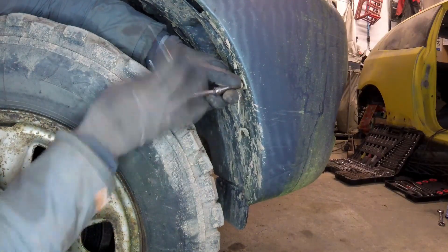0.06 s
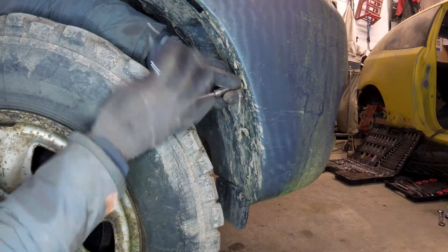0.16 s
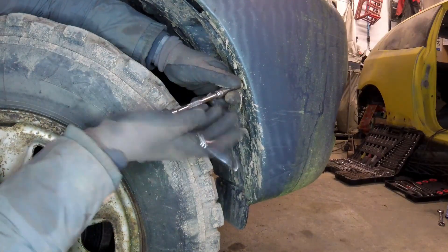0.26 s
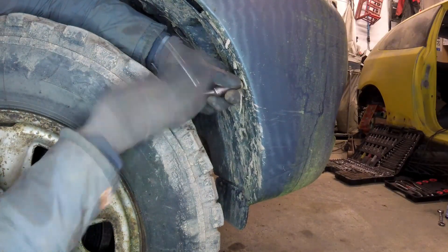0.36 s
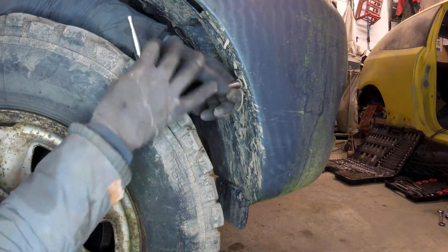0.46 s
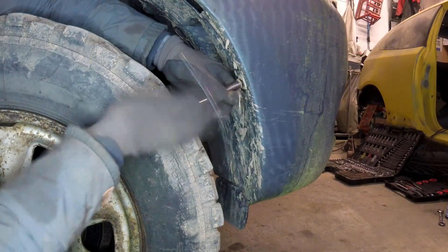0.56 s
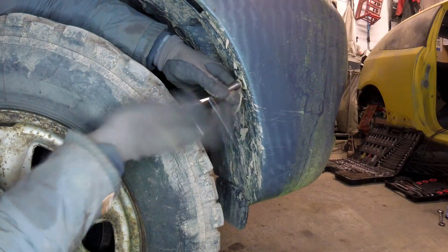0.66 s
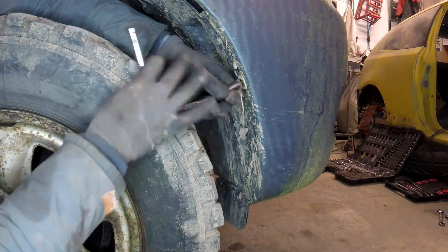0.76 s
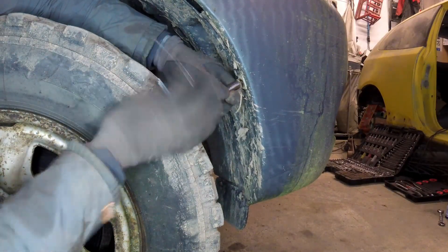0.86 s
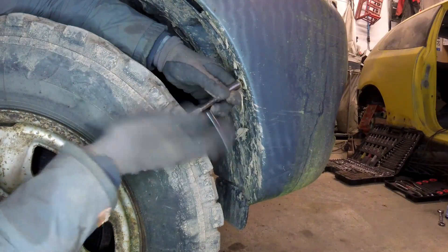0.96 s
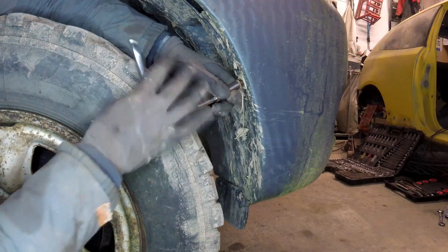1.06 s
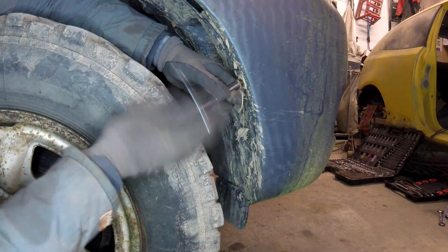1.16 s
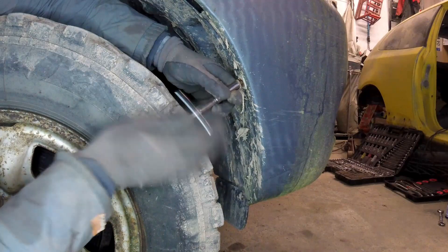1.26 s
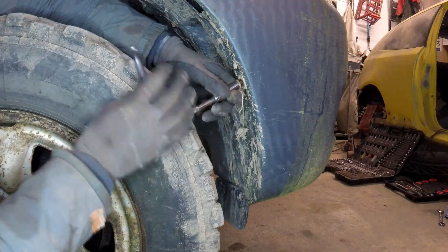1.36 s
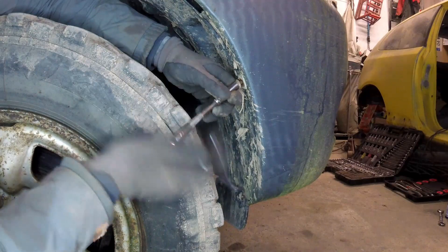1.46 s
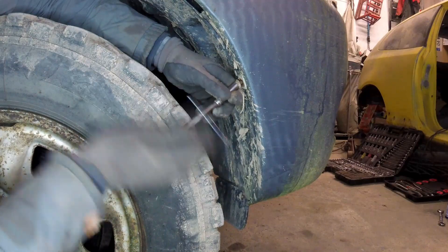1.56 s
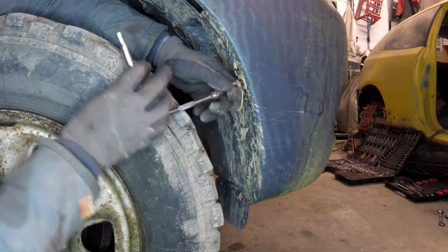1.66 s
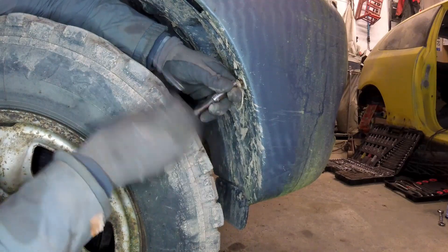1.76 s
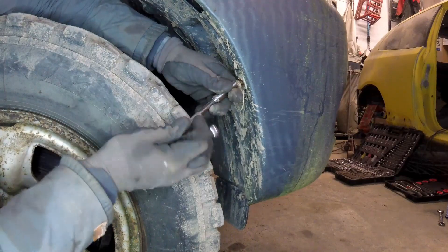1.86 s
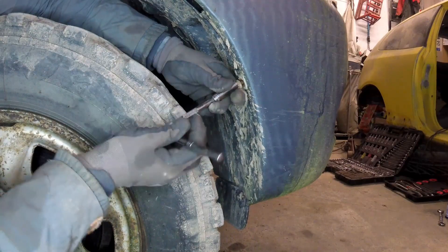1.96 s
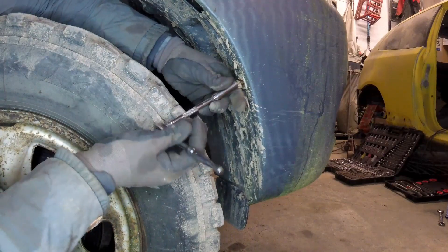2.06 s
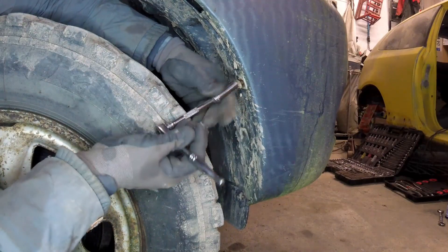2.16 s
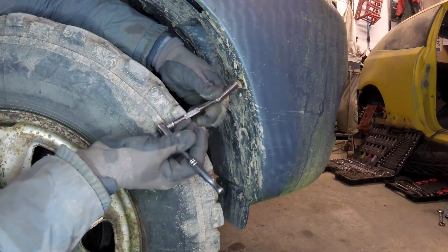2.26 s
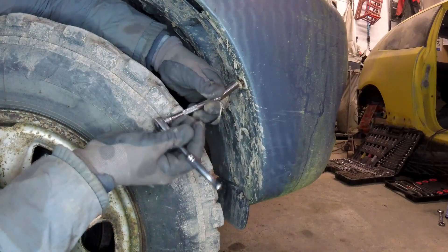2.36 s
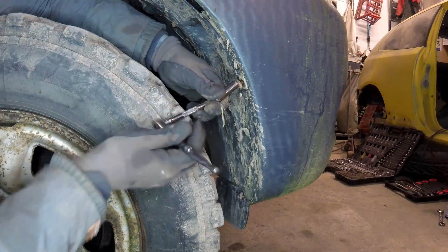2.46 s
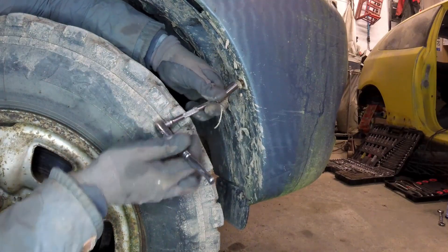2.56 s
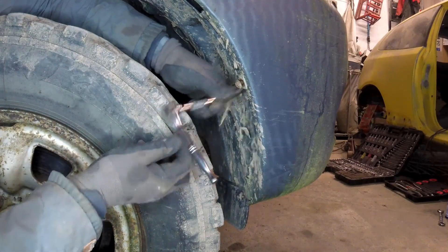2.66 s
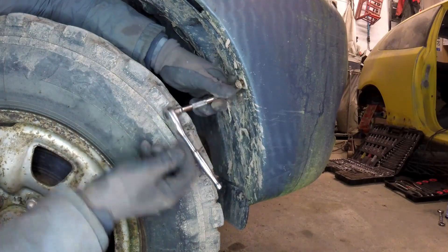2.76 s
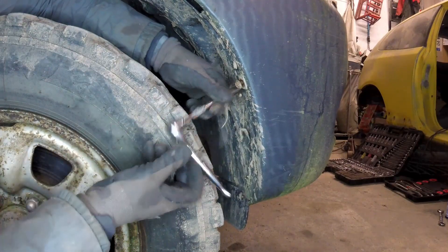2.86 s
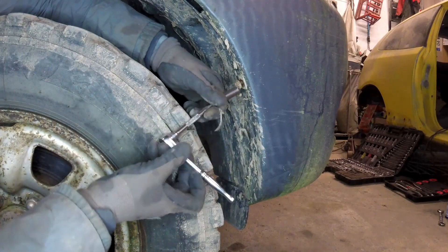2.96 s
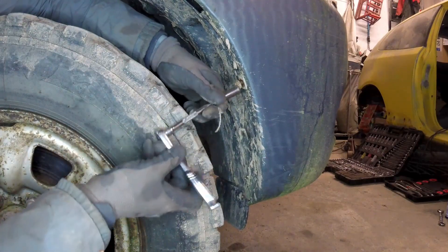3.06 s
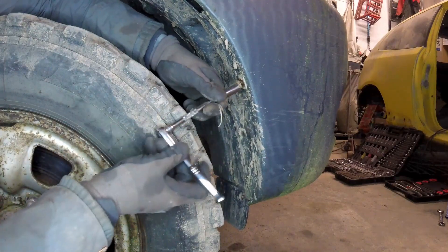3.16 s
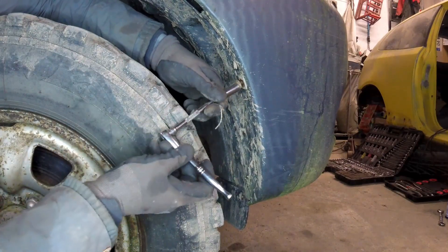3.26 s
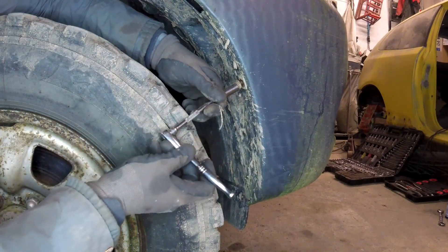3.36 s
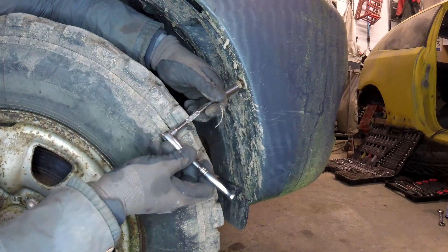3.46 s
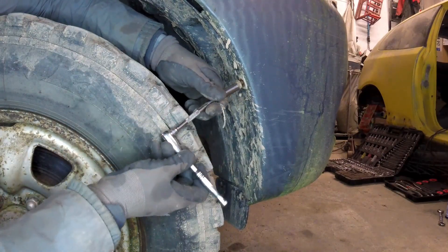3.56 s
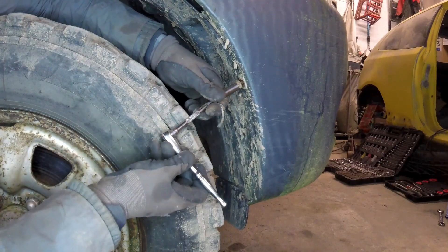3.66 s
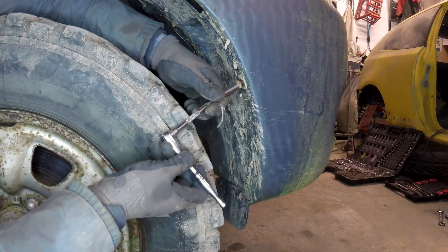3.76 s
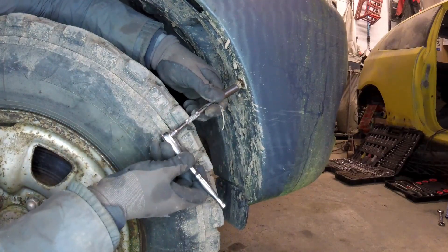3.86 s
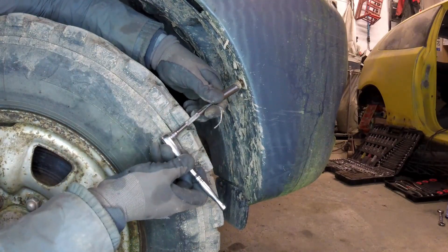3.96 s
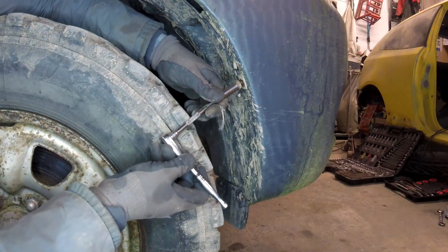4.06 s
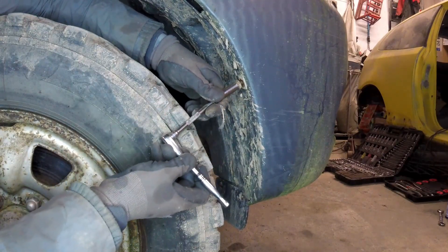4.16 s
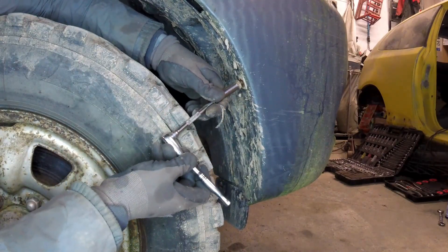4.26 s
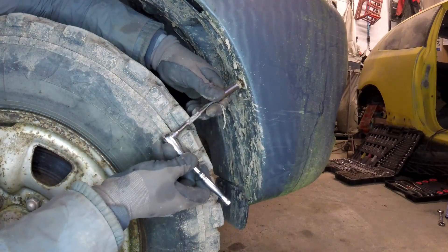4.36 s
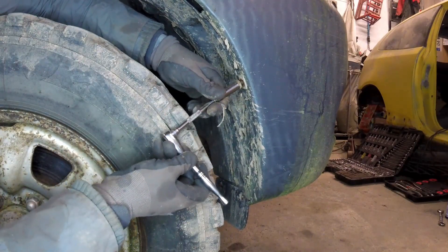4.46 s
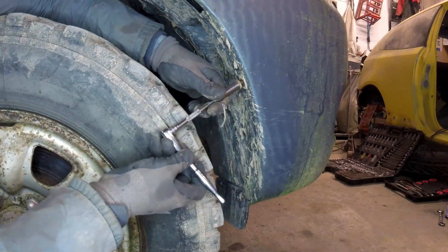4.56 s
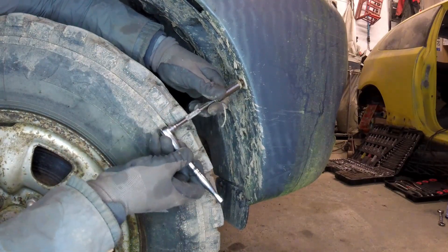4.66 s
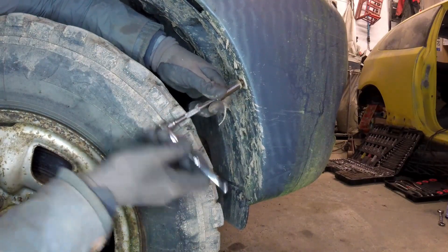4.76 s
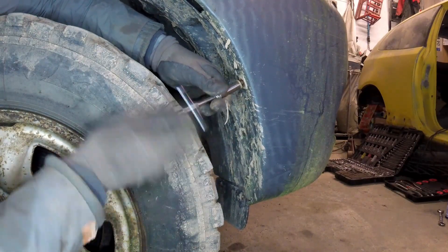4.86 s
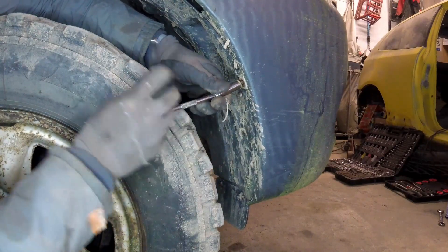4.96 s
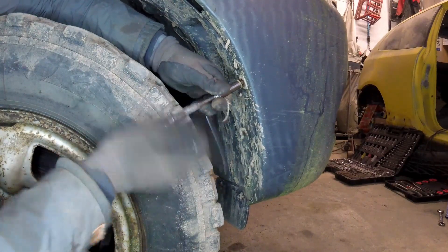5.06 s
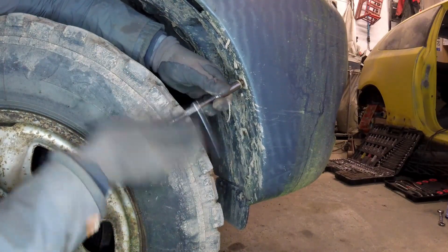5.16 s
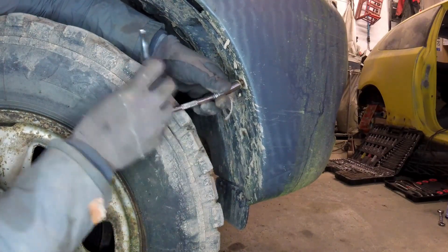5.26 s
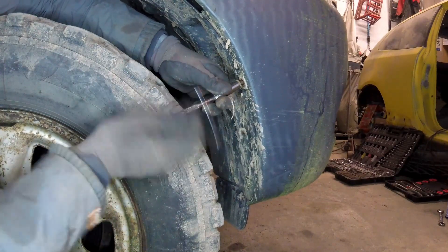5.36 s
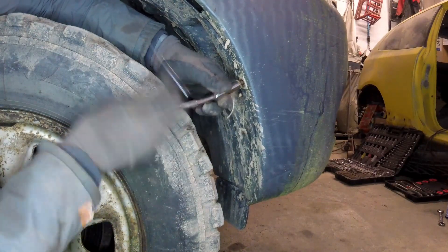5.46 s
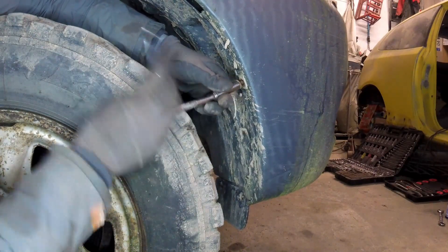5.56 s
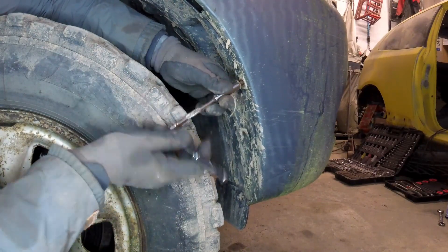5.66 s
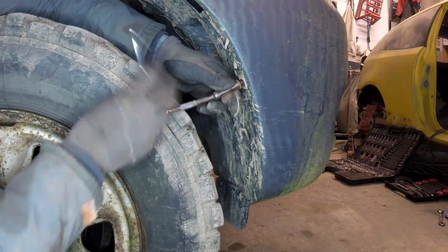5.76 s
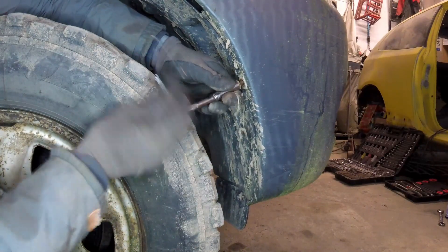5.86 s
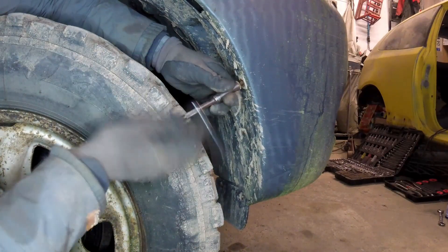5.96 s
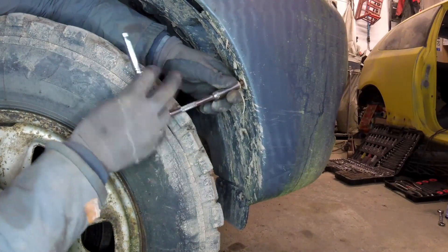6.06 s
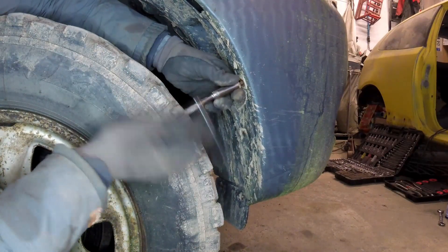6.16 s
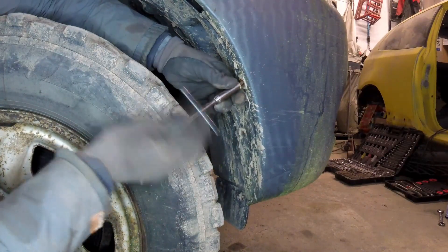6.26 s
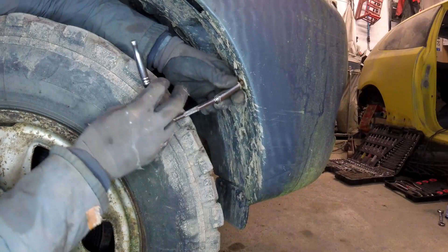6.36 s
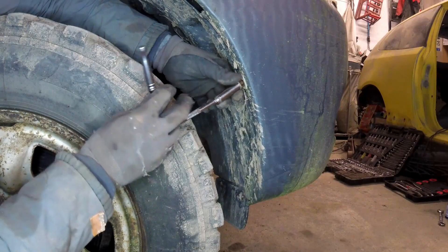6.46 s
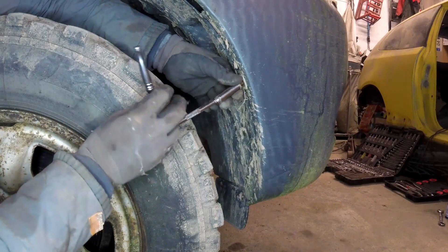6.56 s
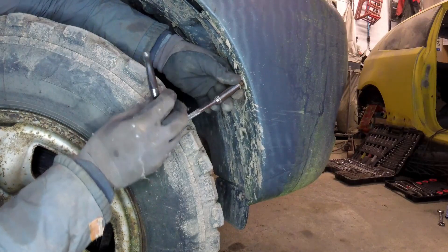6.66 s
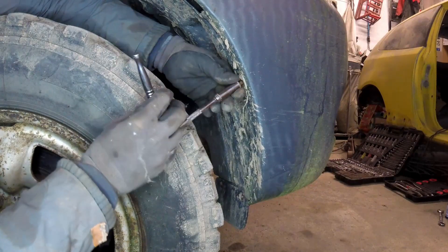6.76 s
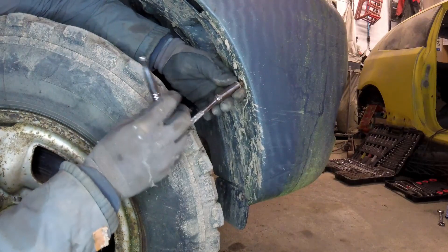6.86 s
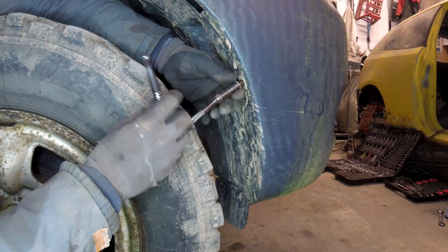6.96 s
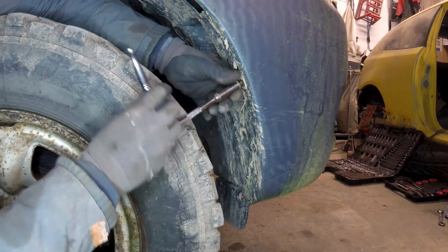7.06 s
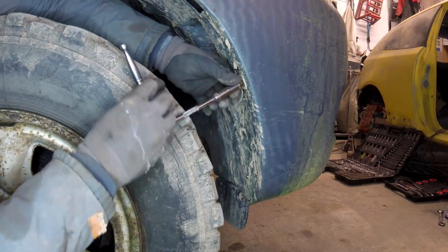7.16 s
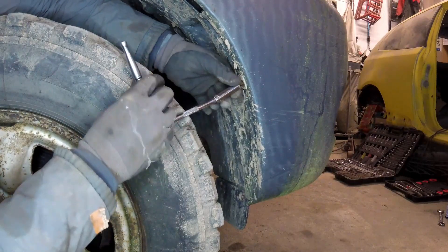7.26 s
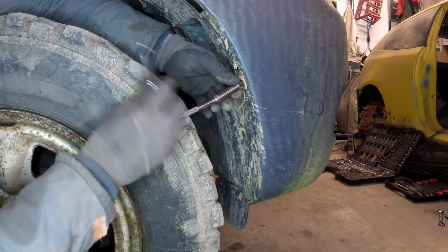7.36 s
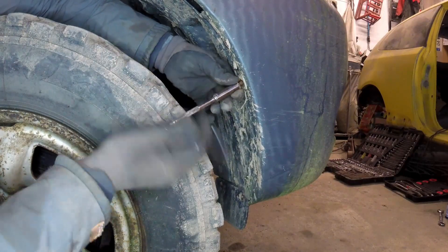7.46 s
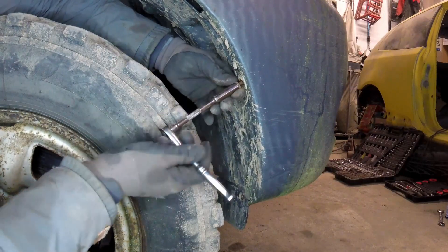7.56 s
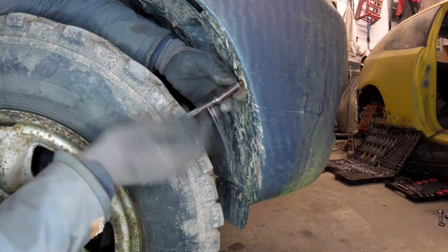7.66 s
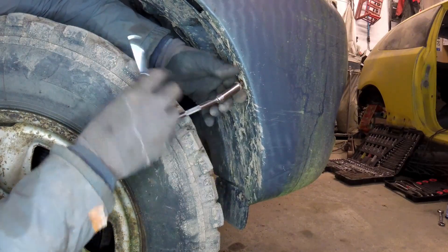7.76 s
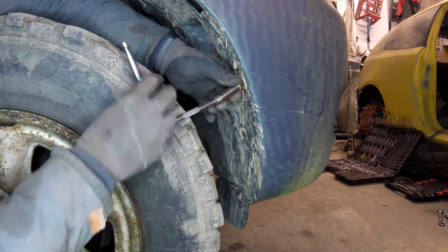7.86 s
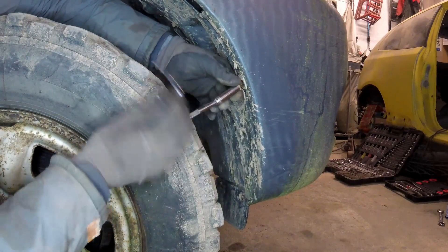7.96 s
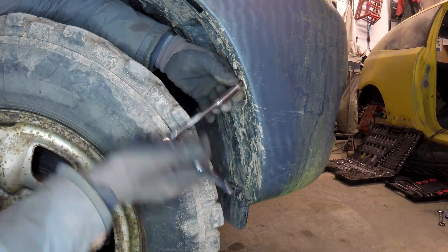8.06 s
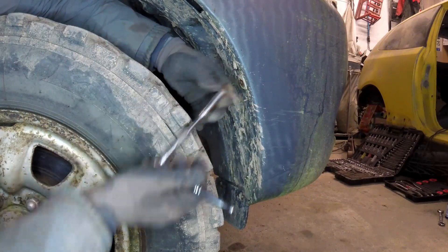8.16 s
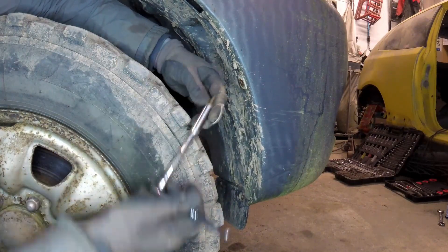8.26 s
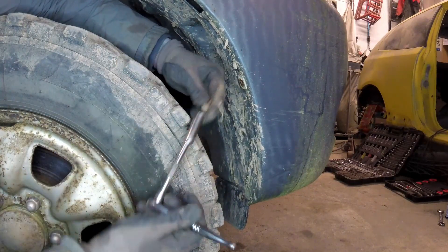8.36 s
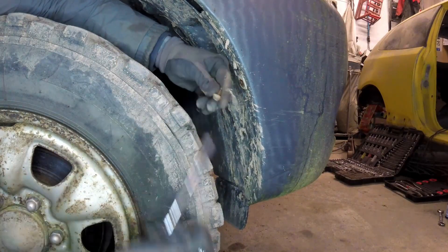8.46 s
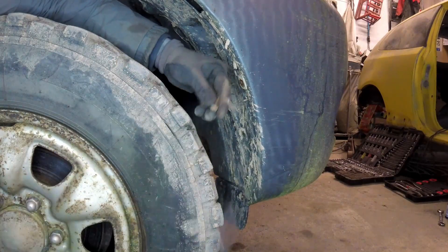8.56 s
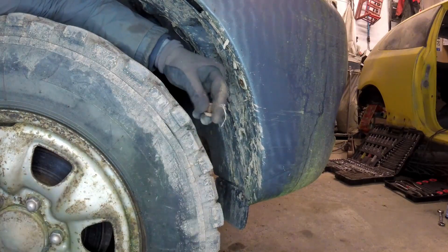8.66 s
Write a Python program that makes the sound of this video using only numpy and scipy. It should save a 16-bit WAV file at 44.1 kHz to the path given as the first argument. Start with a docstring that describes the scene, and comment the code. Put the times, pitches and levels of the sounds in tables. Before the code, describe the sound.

Close by in a quiet workshop, a socket ratchet undoes a bolt in a truck's wheel arch. Quick, bright bursts of clicks come about three a second, with a rattling extension bar and dull panel bumps. The handle then clatters loudly against the wheel as a glove rubs the tyre. After a few scattered metal knocks the ratcheting resumes, thins out, and ends with one sharp click.

```python
"""Socket ratchet in a wheel arch.

A ratchet on a long extension undoes a truck bolt in a quiet workshop. On each back swing the
pawl skips over the teeth and shakes the bar; on each drive swing the thread rasps and the bar
jolts the arch panel. A glove rubs the tyre. Once the handle swings down and clatters on the wheel."""
import sys
import numpy as np
from scipy import signal
from scipy.fft import rfft, irfft
from scipy.io import wavfile

SR = 44100
rng = np.random.default_rng(int(sys.argv[2]) if len(sys.argv) > 2 else 0)


def dump_mix(stems):
    """Bounce the given channels to the path in sys.argv[1] as a 16-bit WAV at rate SR."""
    frames = np.atleast_2d(stems).T  # one column per channel
    limited = np.clip(frames, -1, 1)  # hard clip at full scale
    pcm = np.round(limited * 32767).astype(np.int16)
    wavfile.write(sys.argv[1], SR, pcm)


N = 384993

# Back swings, each followed by a drive swing under load:
# start_s, end_s, top_teeth_per_s, first_click_db, last_click_db, rattle_db, load_db
BACK_SWINGS = [(0.179, 0.251, 276, -25, -28.5, -0.5, -23), (0.4987, 0.595, 314, -26, -30.5, -1.5, -18),
               (0.814, 0.905, 330, -25.5, -28.5, 1.5, -24), (1.104, 1.189, 314, -28.5, -29, -0.5, -25),
               (1.3928, 1.472, 310, -25.5, -31, -3.5, -23), (1.713, 1.78, 228, -22.5, -33.5, -8, -35),
               (4.998, 5.091, 226, -27.5, -28.5, -2, -28), (5.312, 5.379, 293, -26.5, -28, -2, -23),
               (5.571, 5.646, 279, -28.5, -22, -2.5, -23.5), (5.842, 5.916, 300, -24, -23, -7, -20.5),
               (6.133, 6.175, 302, -20, -29.5, -6.5, -30.5), (6.595, 6.684, 148, -24.5, -32, -9.5, -41),
               (7.28, 7.531, 268, -26.5, -26.5, -8.5, -38.5), (7.89, 8.071, 300, -24.5, -26.5, -10, -48)]
# Handle coasting to rest: start_s, stop_s, first_gap_s, level_db
HANDLE_COASTS = [(0.255, 0.29, .027, -31.5), (1.7874, 1.83, .0115, -28), (1.8486, 1.89, .0277, -25),
                 (1.886, 1.99, .0272, -28.5), (2.81, 2.835, 0.015, -27), (2.848, 2.92, .0198, -27.5),
                 (3.062, 3.07, .02, -44.5), (3.5644, 3.57, .02, -45), (5.661, 5.675, 0.0088, -30),
                 (6.7263, 6.75, .013, -29.5), (6.8407, 6.89, .03, -28.5), (7.5326, 7.56, 0.017, -24),
                 (8.089, 8.135, 0.012, -26), (8.7093, 8.711, .02, -14)]
# Hard knocks of socket and handle: start_s, level_db, ring_db, tilt_db_per_oct, panel_jolt_db
TOOL_KNOCKS = [(0.021, -32.5, -10, 1, -15), (0.059, -38.5, -1, 8.5, -39), (0.128, -29.5, -10, 8, -34),
               (0.358, -28, -21, -5.5, -23), (0.691, -26.5, -14, -5, -23.5), (1.503, -36, 8, 0, -37),
               (1.548, -25, -23, -3.5, -23), (1.694, -32.5, -1.5, 1, -25), (2.0295, -39.5, 6, 7.5, -24.5),
               (2.559, -24.5, -30, 1, -24), (2.594, -21, -19, -1.5, -35), (2.608, -19.5, -17, -2.5, -11.5),
               (2.626, -19.5, -12, 1.5, -19), (2.639, -22.5, -8.5, -0.5, -7.5),
               (2.65, -18.5, -12, -0.5, -18), (2.667, -23, -15.5, -4.5, -27), (2.868, -28.5, -17, 0, -18.5),
               (2.902, -23, -29, -4, -21.5), (3.168, -36.5, -31, -0.5, -38), (3.288, -32, -31, -2, -30),
               (3.308, -27.5, -25, -2, -22), (3.348, -31.5, -21, -2.5, -29), (3.495, -24.5, -7.5, 0.5, -16),
               (4.367, -22.5, -18, -2, -18.5), (4.727, -25, -36, 2.5, -36), (4.746, -27.5, -23, -3, -22),
               (5.089, -33, -4, 5, -23), (8.7052, -40, 25, -5, -26)]
# Dull bumps of hand and tool on the panel: start_s, level_db, tilt_db_per_oct
PANEL_BUMPS = [(0.074, -25, -7), (0.724, -20.5, -7), (1.002, -23, 0), (1.457, -20.5, -6),
               (1.699, -16.5, -8.5), (2.186, -20.5, -1.5), (2.719, -19, -4), (3.269, -29, 5),
               (3.734, -33.5, -11), (5.226, -25, -2.5), (6.094, -26.5, -1), (6.38, -32.5, -6),
               (8.05, -32, -1)]
# Bolt turned without ratcheting: start_s, end_s, level_db
HAND_TURNS = [(0, .18, -51), (2.1, 2.32, -60), (2.35, 2.54, -53.5), (2.56, 2.83, -55), (4.72, 4.98, -59.5),
              (8.06, 8.46, -57), (8.5, 8.78, -57)]
# Glove sliding over the tyre to a new grip: start_s, end_s, level_db
GRIP_CHANGES = [(0, .18, -51), (1.42, 1.63, -49.5), (2.58, 2.71, -29), (3.26, 3.43, -50),
                (3.505, 3.56, -47.5)]
# Modes of ratchet head and socket: pitch_hz, level_db, t60_s
STEEL_MODES = [(4680, -24, 0.0081), (5100, -18, 0.042), (5370, -2.5, 0.025), (5400, -9, 0.038),
               (6350, 0, 0.033), (6700, -8, 0.039), (6600, -18, 0.0084), (8200, -3, 0.017),
               (8720, -40, .015), (9600, -2, 0.078)]
# Modes of the arch panel: pitch_hz, level_db, t60_s
PANEL_MODES = [(149, -16, .14), (162, -0.5, .24), (181, 7, .11), (219, -6, .22), (255, -2, .17),
               (315, -8, .18), (339, -8, .17), (364, -5.5, .16), (431, -10.5, .18), (474, -7, .13),
               (640, -16, .18)]
# Pawl snap: freq_hz, level_db
PAWL_SPECTRUM = [(2500, -23), (3900, -20.5), (4500, -12.5), (5100, 3), (5600, 3.5), (6400, -5), (7500, -3),
                 (10000, -7.5), (11200, -15), (12200, -29), (13500, -23), (15500, -35)]
# Extension bar rattle: freq_hz, level_db
BAR_SPECTRUM = [(200, 6.5), (450, 5.5), (800, -5.5), (1200, 0), (1550, -0.5), (1800, -1.5), (2020, -6.5),
                (2450, -4.5), (2950, -6), (3800, -19.5), (6000, -55)]
# Steel-on-steel crack: freq_hz, level_db
KNOCK_SPECTRUM = [(130, 8), (300, 2), (600, -3.5), (1000, 0), (1500, -6.5), (2000, -11), (2900, -11.5),
                  (4000, -25), (5300, -19), (10000, -64)]
# Thread rasp: freq_hz, level_db
THREAD_SPECTRUM = [(300, -2.5), (900, -1), (1600, -3), (3000, -5.5), (4000, -12.5), (4800, -3.5),
                   (5400, 3.5), (6300, -10), (8000, -8.5), (9600, -7.5), (11500, -29), (15000, -32)]
# Glove rub: freq_hz, level_db
GLOVE_SPECTRUM = [(110, -24.5), (160, -5.5), (400, 1.5), (700, -6.5), (1400, -17), (3000, -27),
                  (4500, -30.5), (10000, -50)]
# Workshop air: freq_hz, level_db
AIR_SPECTRUM = [(25, -19.5), (70, 2), (105, -8.5), (135, -0.5), (160, -5.5), (246, -12), (500, -24),
                (900, -25), (1700, -29.5), (3170, -37.5), (4040, -48.5), (5400, -36), (6550, -40),
                (9600, -39.5), (12000, -50.5), (15500, -55)]

DRIVE_S, TAKE_UP_S = .21, .025  # longest drive swing; slack before the pawl takes the load


def ratchet(end_speed_ratio=.45, jitter=.06, scatter_db=2, swell_db=5, max_teeth=80):
    """The pawl skips faster, then slower, through each back swing; teeth go from bright to round."""
    out = np.zeros(N)
    stages = np.linspace(0, 1, 5)
    for start_s, end_s, top_teeth_per_s, first_db, last_db, rattle_db, _ in BACK_SWINGS:
        # Neighbouring teeth sound alike, so a fast run takes on a pitch.
        alike = np.array([(tooth(tilt), bar_shudder()) for tilt in np.linspace(3, -5, len(stages))])
        loose = np.array([(tooth(), bar_shudder()) for _ in range(6)])
        deviations = rng.standard_normal((max_teeth, 2))
        picks = rng.integers(len(loose), size=max_teeth)
        at_s = start_s
        for (late, strength), pick in zip(deviations, picks):
            if at_s > end_s:
                break
            progress = (at_s - start_s) / (end_s - start_s)
            arc = np.sin(np.pi * progress)
            blend = np.sqrt(np.maximum(1 - np.abs(stages - progress) / stages[1], 0))
            click, rattle = np.tensordot(blend, alike, 1) + .71 * loose[pick]
            # The bar shakes most while the hand speeds up.
            bar_db = rattle_db - 3.5 + 3 * (arc - 1) - 4 * (progress - .5)
            force = np.sin(np.pi * progress ** 2.37)  # peaks after mid-swing
            level_db = first_db + (last_db - first_db) * progress
            level_db += scatter_db * strength + swell_db * (force - .6)
            add(out, at_s, undb(level_db) * (peak(click) + undb(bar_db) * peak(rattle)))
            teeth_per_s = top_teeth_per_s * (end_speed_ratio + (1 - end_speed_ratio) * arc)
            at_s += (1 + jitter * late) / teeth_per_s
    return out


def tooth(tilt_db_per_oct=0, snap_t60_s=.007, rise_s=.00012, bounce_s=.0015, bounce_db=-5, ring_db=-20):
    """The pawl snaps into a tooth gap, bounces once and rings the steel."""
    t = clock(.04)
    snap = rng.standard_normal(len(t)) * fade(t, snap_t60_s) * (1 - np.exp(-t / rise_s))
    delay_s = bounce_s * rng.uniform(.591, 1.6)
    snap += undb(bounce_db) * np.interp(t - delay_s, t, snap, left=0)
    seating = rng.uniform(.95, 1.07)  # no two teeth seat alike
    snap = colour(snap, [(hz * seating, db + tilt_db_per_oct * np.log2(hz)) for hz, db in PAWL_SPECTRUM])
    steel = ring(STEEL_MODES, t, tilt_db_per_oct, scatter_db=4, detune=.04)
    return peak(peak(snap) + undb(ring_db) * peak(steel))


def bar_shudder(t60_s=.034):
    """One tooth shakes the long extension bar."""
    t = clock(.04)
    return peak(colour(rng.standard_normal(len(t)) * fade(t, t60_s), BAR_SPECTRUM))


def coasting_teeth(gap_growth=1.5, rattle_db=-15):
    """Lone, crisp teeth, ever further apart as the handle comes to rest."""
    out = np.zeros(N)
    for at_s, stop_s, gap_s, level_db in HANDLE_COASTS:
        while at_s < stop_s:
            add(out, at_s, undb(rng.normal(level_db, 1)) * tooth(tilt_db_per_oct=3, snap_t60_s=.0046))
            add(out, at_s, undb(level_db + rattle_db) * bar_shudder())
            at_s += gap_s
            gap_s *= gap_growth
    return out


def drive_swings():
    """A drive follows each back swing, at most until the next: start_s, end_s, load_db."""
    next_starts_s = [swing[0] for swing in BACK_SWINGS[1:]] + [np.inf]
    return [(turn_s, min(turn_s + DRIVE_S, next_s), load_db)
            for (_, turn_s, *_, load_db), next_s in zip(BACK_SWINGS, next_starts_s)]


def pawl_catches(level_db=-39, scatter_db=2):
    """The pawl clinks as each drive swing takes up the slack."""
    out = np.zeros(N)
    for turn_s, *_ in drive_swings():
        gain = undb(rng.normal(level_db, scatter_db))
        add(out, turn_s + TAKE_UP_S, gain * tooth(tilt_db_per_oct=-5, snap_t60_s=.014))
    return out


def knocks(crack_t60_s=.011, spill_t60_s=.13, spill_db=-12, rise_s=.00085, crack_boost_db=2):
    """Steel meets steel: a crack, a short clang and a spill of sound round the arch."""
    out, t = np.zeros(N), clock(.3)
    envelope = (fade(t, crack_t60_s) + undb(spill_db) * fade(t, spill_t60_s)) * (1 - np.exp(-t / rise_s))
    for at_s, level_db, ring_db, tilt_db_per_oct, _ in TOOL_KNOCKS:
        spectrum = [(hz, db + tilt_db_per_oct * np.log2(hz)) for hz, db in KNOCK_SPECTRUM]
        crack = peak(colour(rng.standard_normal(len(t)) * envelope, spectrum))
        clang = tooth(tilt_db_per_oct=-7, snap_t60_s=.028)
        add(out, at_s, undb(level_db + crack_boost_db) * crack)
        add(out, at_s, undb(level_db + ring_db) * clang)
    return out


def panel_pushes(knock_lag_s=.00296, wobble_db=-9.5, scatter_db=3.5, wobbles=4):
    """Bumps, knocks, load take-up and bar wobble push the panel: start_s, level_db, tilt_db_per_oct."""
    pushes = list(PANEL_BUMPS) + [(at_s + knock_lag_s, jolt_db, .5) for at_s, *_, jolt_db in TOOL_KNOCKS]
    for (start_s, *_), (turn_s, end_s, load_db) in zip(BACK_SWINGS, drive_swings()):
        pushes.append((turn_s + TAKE_UP_S, load_db, -4))
        progress = (np.arange(wobbles) + rng.random(wobbles)) / (wobbles + 1)
        for at_s in start_s + (end_s - start_s) * progress:
            pushes.append((at_s, rng.normal(load_db + wobble_db, scatter_db), -1))
    return pushes


def arch_panel(lead_s=.00504, rise_s=.005, trim_db=-2.5):
    """Each push sets the panel booming; the boom swells in over a few milliseconds."""
    out, t = np.zeros(N), clock(.35)
    onset = 1 - np.exp(-t / rise_s)
    for at_s, level_db, tilt_db_per_oct in panel_pushes():
        boom = onset * ring(PANEL_MODES, t, tilt_db_per_oct, scatter_db=1.6, detune=.02)
        add(out, at_s - lead_s, undb(level_db + trim_db) * peak(boom))
    return out


def thread_rasp(drive_db=-61):
    """The bolt rasps in its thread on drive swings and hand turns."""
    drives = [(start_s, end_s, drive_db) for start_s, end_s, _ in drive_swings()]
    return friction(drives + list(HAND_TURNS), THREAD_SPECTRUM, grain_db=3.5)


def glove_rub(follow_s=.079, rub_re_load_db=-22):
    """The glove drags over the tyre at grip changes and on each stroke, harder with more load."""
    strokes = [(start_s, end_s + follow_s, load_db + rub_re_load_db)
               for start_s, end_s, *_, load_db in BACK_SWINGS]
    return friction(strokes + list(GRIP_CHANGES), GLOVE_SPECTRUM, grain_db=4.5)


def friction(moves, spectrum, grain_db, slip_s=.001):
    """Tiny slips that swell and die with each movement."""
    t = np.arange(N) / SR
    slip_times_s = np.arange(0, N / SR, slip_s)
    slips = np.interp(t, slip_times_s, undb(grain_db * rng.standard_normal(len(slip_times_s))))
    envelope = np.zeros(N)
    for start_s, end_s, level_db in moves:
        progress = np.clip((t - start_s) / (end_s - start_s), 0, 1)
        envelope += undb(level_db) * np.sqrt(np.abs(np.sin(np.pi * progress)))
    return envelope * unit(colour(slips * rng.standard_normal(N), spectrum))


def room(x, near_t60_s=.13, near_db=-14, far_t60_s=.6, far_db=-19):
    """Quick reflections off tyre and arch, then the dull tail of the hall."""
    t = clock(.99)
    near, far = rng.standard_normal((2, len(t)))
    near *= fade(t, near_t60_s) * (t > .002)
    far *= fade(t, far_t60_s) * (t > .015)
    near = colour(near, [(200, -4.5), (700, -11.5), (12000, -10.5)])
    far = colour(far, [(150, -1), (1500, -1.5), (5000, -7.5), (12000, -11.5)])
    response = undb(near_db) * near / np.linalg.norm(near) + undb(far_db) * far / np.linalg.norm(far)
    return x + signal.fftconvolve(x, response)[:N]


def workshop(air_db=-47, hum_hz=125, hum_db=-61, waver=.38):
    """Steady air noise and the wavering hum of a distant motor."""
    t = np.arange(N) / SR
    drift = waver * np.interp(t, np.linspace(0, N / SR, 60), rng.standard_normal(60))
    hum = np.sqrt(2) * (1 + drift) * np.sin(2 * np.pi * hum_hz * t + drift)
    air = unit(colour(rng.standard_normal(N), AIR_SPECTRUM))
    return undb(air_db) * air + undb(hum_db) * hum


def ring(modes, t, tilt_db_per_oct, scatter_db, detune):
    """Decaying modes, struck at a slightly different spot and grip each time."""
    pitch_hz, level_db, t60_s = np.transpose(modes)
    strength, shift = rng.standard_normal((2, len(pitch_hz)))
    gains = undb(level_db + scatter_db * strength + tilt_db_per_oct * np.log2(pitch_hz / pitch_hz[0]))
    waves = np.sin(2 * np.pi * np.outer(pitch_hz * (1 + detune * shift), t))
    return gains @ (waves * fade(t, t60_s[:, None]))


def colour(x, spectrum, taps=2048):
    """Minimum-phase, unit-energy filter shaped by (freq_hz, level_db) points."""
    freq_hz, level_db = np.transpose(spectrum)
    bins_hz = np.fft.rfftfreq(taps, 1 / SR)
    gain = undb(np.interp(np.log(bins_hz + 1), np.log(freq_hz), level_db))
    cepstrum = irfft(np.log(gain))
    cepstrum[1:taps // 2] *= 2
    cepstrum[taps // 2 + 1:] = 0
    response = irfft(np.exp(rfft(cepstrum)))
    return signal.fftconvolve(x, response / np.linalg.norm(response))[:len(x)]


def undb(db):
    """Decibels to gain."""
    return 10 ** (np.asarray(db) / 20)


def unit(x):
    """Scale to rms 1."""
    return x / np.sqrt(np.mean(x ** 2))


def peak(x):
    """Scale to peak 1."""
    return x / np.abs(x).max()


def clock(length_s):
    """Sample times in seconds."""
    return np.arange(int(length_s * SR)) / SR


def fade(t, t60_s):
    """Exponential decay, 60 dB down at t60_s."""
    return np.exp(-np.log(1000) * t / t60_s)


def add(track, at_s, x):
    """Mix x into the track."""
    i = max(int(at_s * SR), 0)
    track[i:i + len(x)] += x[:max(N - i, 0)]


def scene():
    """Tool, panel and hands close by, the workshop around them; mono."""
    pawl = ratchet() + coasting_teeth() + pawl_catches()
    work = pawl + knocks() + arch_panel() + thread_rasp() + glove_rub()
    return (room(work) + workshop())[None]


def record(dry, low_cut_hz=130, leak_db=-28, high_cut_hz=15100):
    """The microphone passes little bass; the top is cut."""
    highpass = signal.ellip(8, .5, 50, low_cut_hz, "high", fs=SR, output="sos")
    lowpass = signal.ellip(8, .2, 70, high_cut_hz, fs=SR, output="sos")
    thinned = signal.sosfilt(highpass, dry) + undb(leak_db) * dry
    return signal.sosfilt(lowpass, thinned)


dry = scene()
out = record(dry)
dump_mix(out)
```